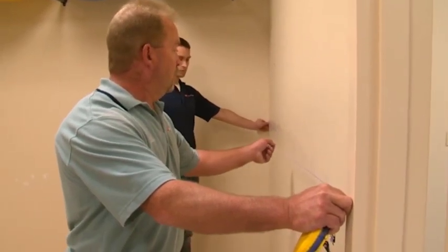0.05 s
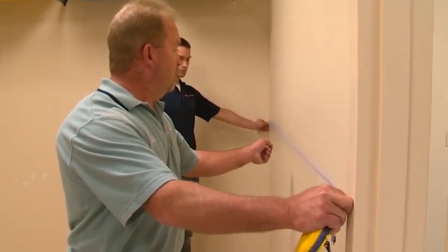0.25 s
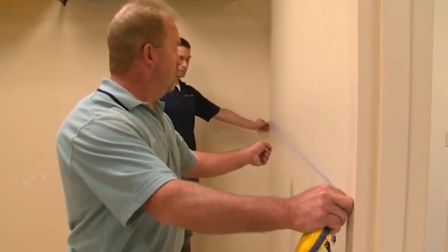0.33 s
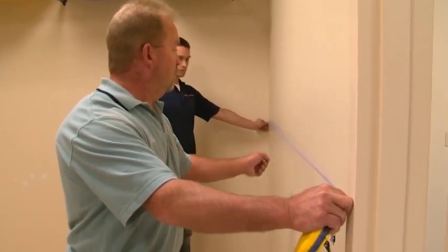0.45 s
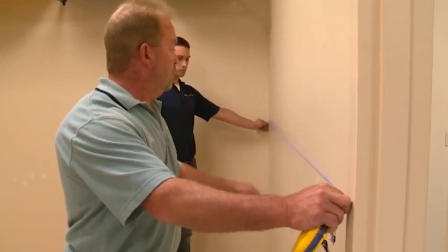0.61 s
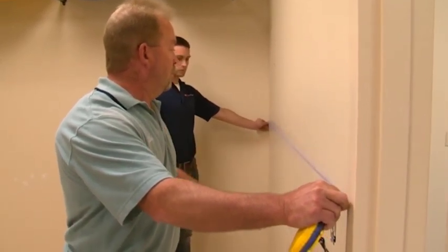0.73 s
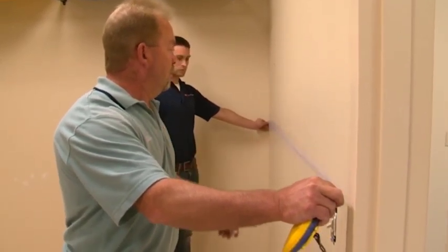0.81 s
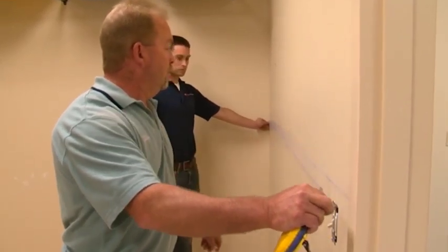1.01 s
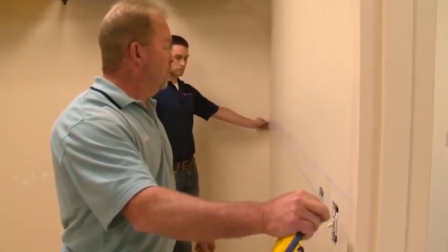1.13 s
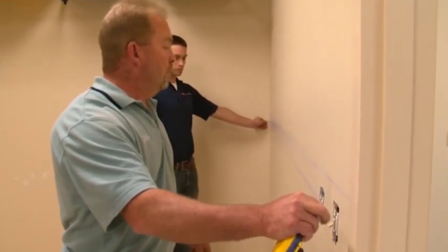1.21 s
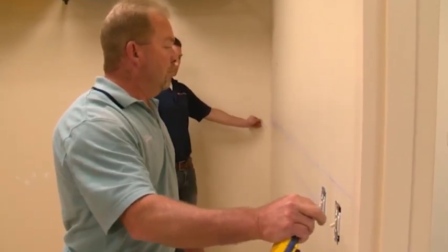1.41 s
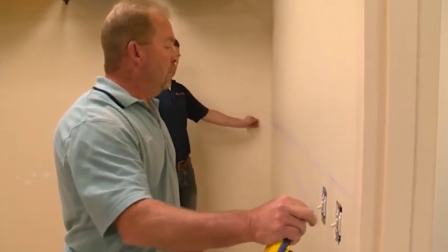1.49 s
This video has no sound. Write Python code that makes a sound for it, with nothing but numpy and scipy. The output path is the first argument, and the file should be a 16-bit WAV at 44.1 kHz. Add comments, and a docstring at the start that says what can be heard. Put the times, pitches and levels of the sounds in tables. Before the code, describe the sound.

A taut chalk line snaps once against a plasterboard wall, a bright gritty slap with a low thump, ringing briefly in a small bare room; then faint ticks, cloth rustle and a slight scrape over low hum.

```python
"""Mains hum and ventilation rumble run throughout, made of two sines and coloured noise.
A taut chalk line swishes in (swelling noise), cracks (very high sine pulse) and slaps a plasterboard
wall nine times in 40 ms (noise bursts); the board thumps (noise, decaying modes), a small bare room rings.
Then come light ticks (noise bands) and sleeve rustles (noise swells); at the end the line is lifted off
with a scrape (noise) and a thin pulsing squeak (sine)."""
import sys
import numpy as np
from scipy import signal
from scipy.fft import rfft, irfft, next_fast_len
from scipy.io import wavfile
from scipy.ndimage import map_coordinates

SR = 44100
rng = np.random.default_rng(int(sys.argv[2]) if len(sys.argv) > 2 else 0)


def store_wav(level_fs):
    """Save 16-bit WAV to argv[1]."""
    pcm = np.round(np.clip(np.atleast_2d(level_fs), -1, 1) * 32767)
    wavfile.write(sys.argv[1], SR, pcm.T.astype(np.int16))


N = 68355


def amp(db):
    """Decibels to gain."""
    return 10 ** (np.asarray(db) / 20)


def unit(x):
    """Scale to rms 1."""
    return x / np.sqrt(np.mean(x ** 2) + 1e-20)


def along(points, hz):
    """Interpolate (f/Hz, value) points on a log frequency axis."""
    f, value = np.transpose(points)
    return np.interp(np.log(hz + 1), np.log(f + 1), value)


def clock():
    """Time of each sample in s."""
    return np.arange(N) / SR


def sine(hz, t):
    """Sine with zero phase at t = 0."""
    return np.sin(2 * np.pi * hz * t)


def filtered(x, response):
    """Multiply the spectrum of x by response(hz), zero-padded."""
    m = next_fast_len(N + SR // 2)
    spectrum = rfft(x, m) * response(np.fft.rfftfreq(m, 1 / SR))
    return irfft(spectrum, m)[:N]


def noise(colour, tilt_db_per_octave=0):
    """Coloured noise of rms 1, tilted above 2 kHz."""
    def response(hz):
        octaves = np.log2(np.maximum(hz, 2000) / 2000)
        return amp(along(colour, hz) + tilt_db_per_octave * octaves)
    return unit(filtered(rng.standard_normal(N), response))


def band(hz, octaves):
    """Noise of rms 1 in a band that is Gaussian over log frequency."""
    def response(f):
        return np.exp(-.5 * (np.log2((f + 1) / hz) / octaves) ** 2)
    return unit(filtered(rng.standard_normal(N), response))


def strike(start_s, attack_s, t60_s):
    """Envelope of a blow: quick rise, exponential fade."""
    t = np.maximum(clock() - start_s, 0)
    return (1 - np.exp(-t / attack_s)) * np.exp(-np.log(1000) * t / t60_s)


def swell(peak_s, rise_s, fall_s):
    """Gaussian bell with separate sigmas before and after its peak."""
    t = clock() - peak_s
    return np.exp(-.5 * (t / np.where(t < 0, rise_s, fall_s)) ** 2)


# mains hum: f/Hz, level/dB rms before the waver
HUM_PARTIALS = [(59.8, -71), (119.8, -54)]
# ventilation and hiss, relative density: f/Hz, level/dB per Hz
AIR_COLOUR = [(15, -2.5), (35, -1.5), (62, 5), (90, -4), (140, -7.5), (200, -19.5), (300, -21.5),
              (400, -18), (700, -30), (1500, -37), (3000, -41), (6000, -48.5), (11000, -54.5), (13000, -58),
              (16000, -58)]
AIR_DB = -59
HUM_WAVER_DB, WAVER_POINTS_PER_S = .25, 6


def background():
    """Mains partials share a slow random level waver, over ventilation noise."""
    waver = map_coordinates(rng.standard_normal(16), [clock() * WAVER_POINTS_PER_S])
    hum = 0
    for hz, db in HUM_PARTIALS:
        cycles = hz * clock() + rng.random()
        hum = hum + amp(db) * np.sqrt(2) * np.sin(2 * np.pi * cycles)
    return hum * amp(HUM_WAVER_DB * waver) + amp(AIR_DB) * noise(AIR_COLOUR)


# relative density of the swish: f/Hz, level/dB per Hz
SWISH_SPECTRUM = [(150, -1.5), (500, 1.5), (2000, -10), (6000, -12), (14000, -11), (16500, -13.5)]
SWISH_S, SWISH_DB = .2286, -45.5
SWISH_RISE_S, SWISH_FALL_S = .006, .0013  # sigmas before squaring


def swish():
    """Air noise grows as the line speeds toward the wall."""
    envelope = swell(SWISH_S, SWISH_RISE_S, SWISH_FALL_S) ** 2
    return amp(SWISH_DB) * envelope * noise(SWISH_SPECTRUM)


# room tail decay: f/Hz, t60/s
TAIL_T60 = [(120, 0.88), (500, 0.61), (1400, 0.66), (3000, 0.5145), (6000, 0.5051), (10000, 0.4),
            (15000, 0.18)]
# room tail gain: f/Hz, level/dB
TAIL_GAIN = [(120, 11.5), (500, -7), (1400, -9), (3000, -12.5), (7000, -6), (14000, -13)]
ROOM_DELAY_S, EARLY_DB, EARLY_T60_S = .005, -4.5, .13


def room(x):
    """Dense early reflections from the near walls, plus a tail that decays at a rate set per frequency."""
    hz, t, z = signal.stft(rng.standard_normal(SR), SR, nperseg=256)
    t60_s = along(TAIL_T60, hz)[:, None]
    unit_energy = np.sqrt(2 * np.log(1000) / (t60_s * SR))
    decay = np.exp(-np.log(1000) * t / t60_s) * unit_energy
    gain = amp(along(TAIL_GAIN, hz))[:, None]
    tail = signal.istft(z * decay * gain, SR, nperseg=256)[1][:SR]
    early = rng.standard_normal(SR) * np.exp(-np.log(1000) * np.arange(SR) / SR / EARLY_T60_S)
    answer = tail + amp(EARLY_DB) * early / np.linalg.norm(early)
    delayed = np.pad(answer, (int(ROOM_DELAY_S * SR), 0))
    return signal.fftconvolve(x, delayed)[:N]


# narrow peaks in the slaps and their room sound: f/Hz, width/Hz, level/dB re unfiltered
SLAP_PEAKS = [(2440, 40, -3.5), (2733, 22, 0), (2882, 80, -1), (3430, 63, -1.5), (3820, 80, -9.5),
              (4304, 26, -4), (5080, 50, -6.5)]


def slap_peaks(hz):
    """Narrow peaks that colour the slaps and their room sound, ringing briefly."""
    response = 1
    for centre, width, db in SLAP_PEAKS:
        peak = 1j * hz * width / (centre ** 2 - hz ** 2 + 1j * hz * width)
        response = response + amp(db) * peak
    return response


# line meeting the wall stretch by stretch: t/s, level/dB, t60/s, treble tilt/dB per octave
SLAP_EVENTS = [(.2310, -33, 0.017, 3), (0.235, -25.5, 0.018, 2.5), (0.2369, -28, 0.038, 3),
               (0.2409, -23.5, 0.022, -2), (0.2437, -27, .026, -3), (0.2492, -31, .020, -2.5),
               (0.251, -26.5, .030, -0.5), (.2570, -35, .050, -2), (0.2709, -33.5, 0.017, -1.5)]
# relative density of a slap: f/Hz, level/dB per Hz
SLAP_SPECTRUM = [(60, -29.5), (200, -14), (310, -13.5), (420, -7), (950, -6), (1300, -9), (1700, -9),
                 (2200, -7), (2800, 0), (4200, -4.5), (6000, -10.5), (8200, -14), (11000, -13.5),
                 (14700, -14.5), (16500, -20.5)]
CONTACT_ATTACK_S = .00018  # slaps and ticks


def slaps():
    """Each landing stretch of line is a gritty burst with its own path through the room."""
    bursts = [amp(db) * strike(start_s, CONTACT_ATTACK_S, t60_s) * noise(SLAP_SPECTRUM, tilt)
              for start_s, db, t60_s, tilt in SLAP_EVENTS]
    in_room = sum(burst + room(burst) for burst in bursts)
    return filtered(in_room, slap_peaks)


CRACK_S, CRACK_DB, CRACK_HZ, CRACK_SIGMA_S = .2345, -14.5, 13600, .00012


def crack():
    """A few cycles of very high treble as the line whips."""
    envelope = swell(CRACK_S, CRACK_SIGMA_S, CRACK_SIGMA_S)
    return amp(CRACK_DB) * envelope * sine(CRACK_HZ, clock() - CRACK_S)


# wall board modes: f/Hz, level/dB, t60/s
BOARD_MODES = [(68, -48, 0.14), (99.54, -39, 0.064), (125.7, -42.5, .15), (176, -49.5, 0.21),
               (253, -46, .25), (365, -52.5, 0.17), (430.8, -47, 0.23), (479, -49, 0.36), (529, -50.5, .45),
               (572, -46, 0.42), (674, -51, 0.32), (917, -48.5, .2)]
# relative density of the thud: f/Hz, level/dB per Hz
THUD_SPECTRUM = [(40, -25.5), (70, -8), (105, 2), (160, -8), (250, -0.5), (320, -9.5), (430, -6),
                 (700, -19), (1500, -39.5), (6000, -80)]
BOARD_S, BOARD_ATTACK_S = .2425, .0018
THUD_S, THUD_DB, THUD_RISE_S, THUD_FALL_S = .251, -39.5, .005, .009


def board():
    """The struck board rings in its low modes and thuds dully under the main slaps."""
    t = clock() - BOARD_S
    ring = sum(amp(db) * strike(BOARD_S, BOARD_ATTACK_S, t60_s) * sine(hz, t)
               for hz, db, t60_s in BOARD_MODES)
    thud = amp(THUD_DB) * swell(THUD_S, THUD_RISE_S, THUD_FALL_S) * noise(THUD_SPECTRUM)
    return ring + thud


# ticks of the line and its case: t/s, level/dB, f/Hz
TICK_EVENTS = [(0.4714, -68, 8320), (0.471, -55, 792), (.755, -70.5, 897), (1.170, -74, 3220)]
TICK_T60_S, TICK_OCTAVES, TICK_ROOM_DB = .024, .36, -14


def ticks():
    """Light contacts, each a short band of noise."""
    return sum(amp(db) * strike(start_s, CONTACT_ATTACK_S, TICK_T60_S) * band(hz, TICK_OCTAVES)
               for start_s, db, hz in TICK_EVENTS)


# sleeve movements: t/s, level/dB, rise/s, fall/s, treble tilt/dB per octave
RUSTLE_EVENTS = [(.755, -77, 0.027, 0.026, 0), (.96, -76, .12, 0.17, -5), (1.19, -79, .018, .035, 3.5),
                 (1.29, -79, 0.042, .05, 4)]
# relative density of cloth noise: f/Hz, level/dB per Hz
CLOTH_SPECTRUM = [(100, -18), (400, 2.5), (900, 1.5), (1400, -6), (2000, -11), (3300, -10.5), (6000, -23.5),
                  (11000, -32), (16000, -50)]


def sleeves():
    """Moving cloth rustles as swells of mostly low and middle noise."""
    return sum(amp(db) * swell(peak_s, rise_s, fall_s) * noise(CLOTH_SPECTRUM, tilt)
               for peak_s, db, rise_s, fall_s, tilt in RUSTLE_EVENTS)


# relative density of the scrape: f/Hz, level/dB per Hz
SCRAPE_SPECTRUM = [(150, -6.5), (600, 2.5), (1500, -5), (3000, -9), (7000, -16), (12000, -22), (16000, -31)]
SCRAPE_S, SCRAPE_DB, SCRAPE_RISE_S, SCRAPE_FALL_S = 1.545, -69.5, .025, .06
SQUEAK_HZ, SQUEAK_RE_SCRAPE_DB = 2910, -7
STICK_SLIP_HZ, STICK_SLIP_DEPTH = 130, .54


def scrape():
    """The lifted line scrapes as noise, with a squeak pulsed at the stick-slip rate."""
    slips = 1 + STICK_SLIP_DEPTH * sine(STICK_SLIP_HZ, clock())
    squeak = amp(SQUEAK_RE_SCRAPE_DB) * unit(slips * sine(SQUEAK_HZ, clock()))
    envelope = swell(SCRAPE_S, SCRAPE_RISE_S, SCRAPE_FALL_S)
    return amp(SCRAPE_DB) * envelope * (noise(SCRAPE_SPECTRUM) + squeak)


def scene():
    """Sum all sources; whip and ticks share one room echo, slaps bring their own."""
    whip = swish() + crack()
    taps = ticks()
    echo = room(whip + amp(TICK_ROOM_DB) * taps)
    mix = whip + taps + echo + slaps() + board() + sleeves() + scrape() + background()
    return mix[None]


TOP_HZ, TOP_ORDER = 16200, 60


def record(dry):
    """Steep low-pass at the top of the band."""
    def response(hz):
        return 1 / (1 + (hz / TOP_HZ) ** TOP_ORDER)
    return np.array([filtered(channel, response) for channel in dry])


dry = scene()
out = record(dry)
store_wav(out)
```